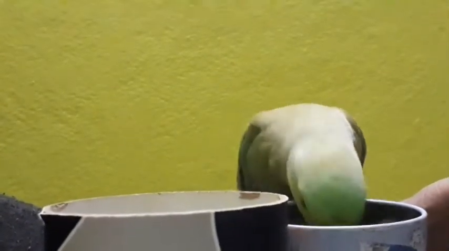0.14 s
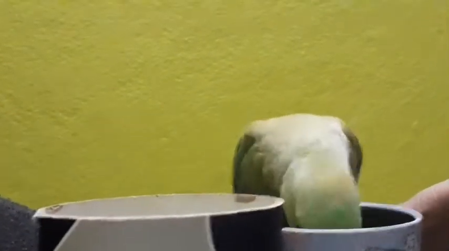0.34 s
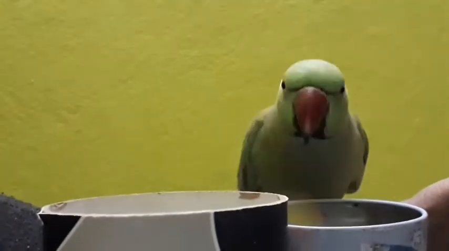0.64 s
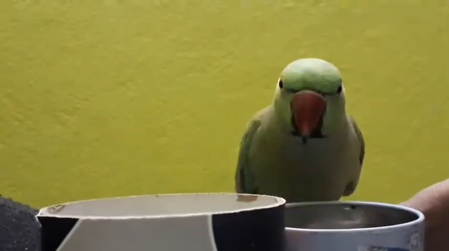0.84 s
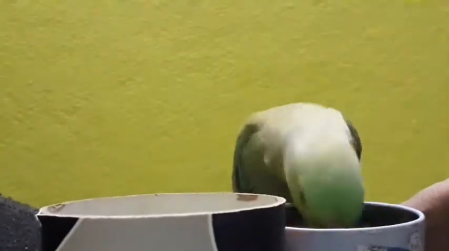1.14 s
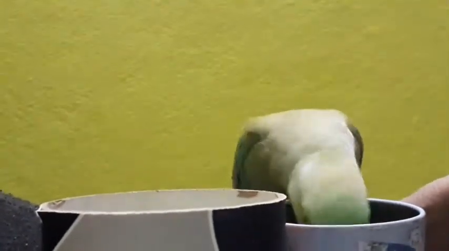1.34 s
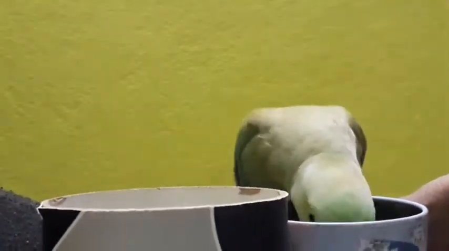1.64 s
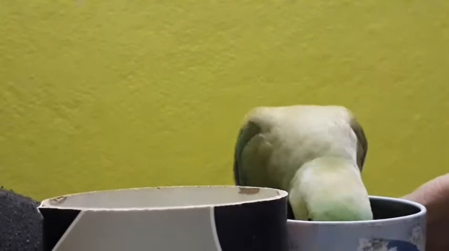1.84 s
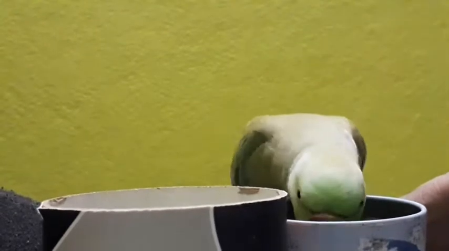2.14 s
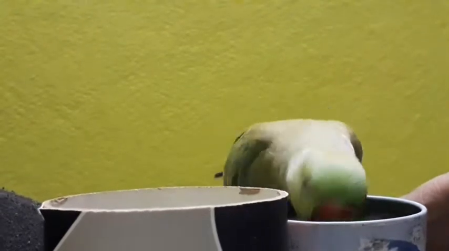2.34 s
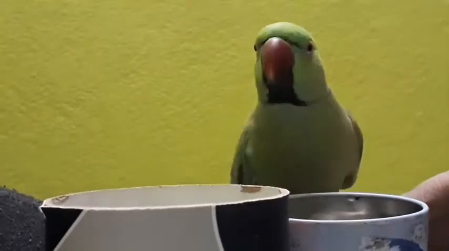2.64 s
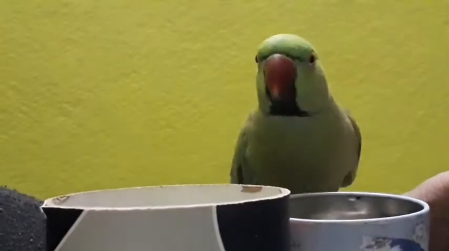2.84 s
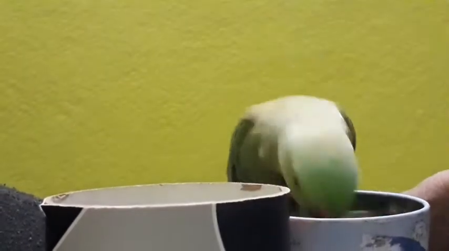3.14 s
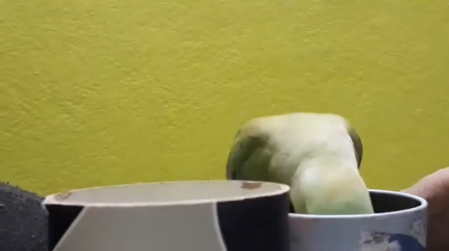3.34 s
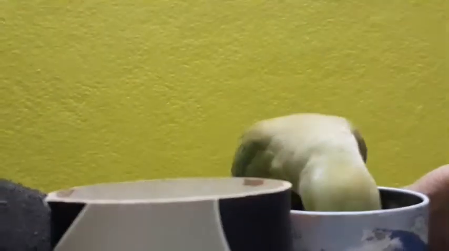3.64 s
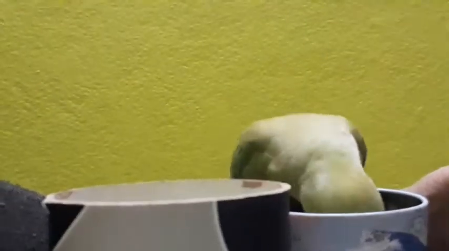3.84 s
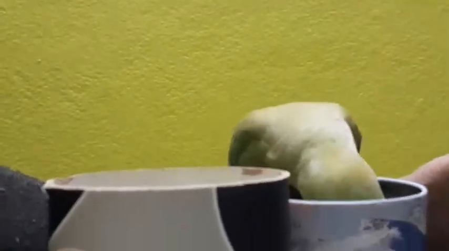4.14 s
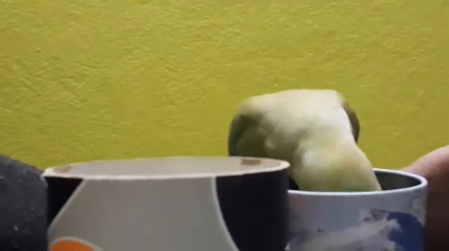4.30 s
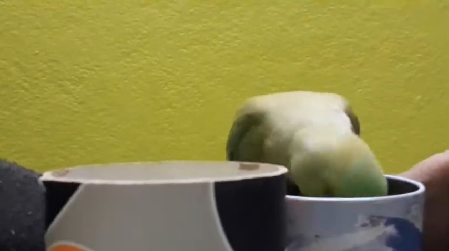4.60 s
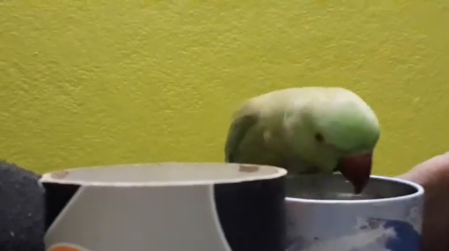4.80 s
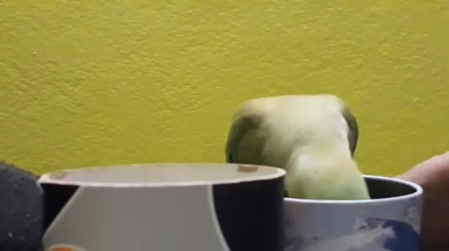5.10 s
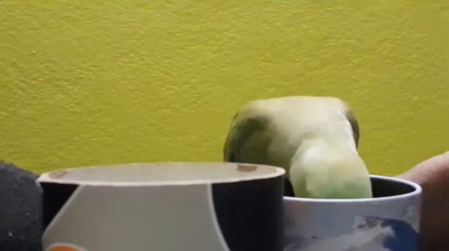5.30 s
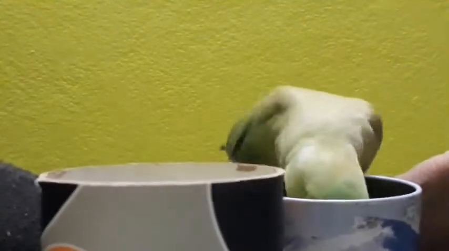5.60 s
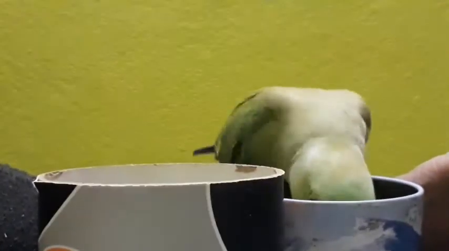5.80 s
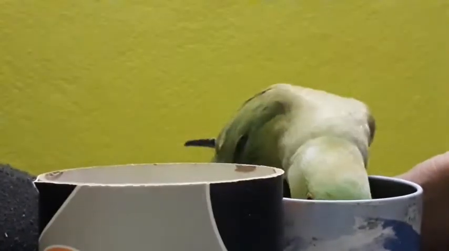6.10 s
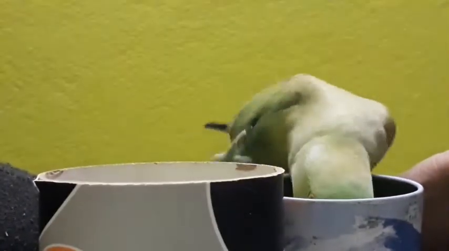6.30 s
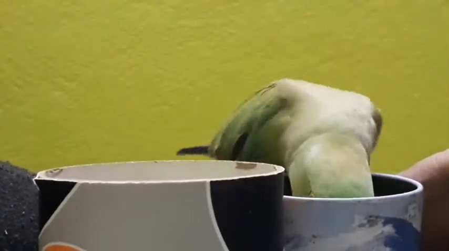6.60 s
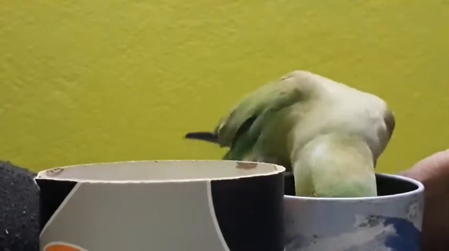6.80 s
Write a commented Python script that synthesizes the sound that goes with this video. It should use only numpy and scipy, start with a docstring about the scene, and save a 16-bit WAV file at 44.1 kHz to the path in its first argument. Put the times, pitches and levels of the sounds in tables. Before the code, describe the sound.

A parakeet's beak picks at coins in a small metal tin, with bright clinks, a coin bouncing on the table, then duller rattling knocks over soft fan hum.

```python
"""A ceiling fan swishes softly throughout, as throbbing hum and noise; hiss lies under it.
A parakeet's beak slides coins (filtered friction clicks) in a small metal tin, close to a phone in a hard room.
A clock ticks each second, as noise through short modes; coins knock on the tin as chatter, bright while loose.
Coins ring as decaying tones; a dropped one bounces on the table, chattering on a duller body.
Feathers rub the rim as the head dips in; then the bird presses into the heap and the knocks turn dull."""
import sys
import numpy as np
from scipy import signal
from scipy.fft import rfft, irfft
from scipy.io import wavfile

SR = 44100
rng = np.random.default_rng(int(sys.argv[2]) if len(sys.argv) > 2 else 0)


def wav_record(signal):
    """Record a signal, one row per channel, as 16-bit PCM in the file named by sys.argv[1]."""
    frames = np.transpose(np.atleast_2d(signal))
    bounded = np.clip(frames, -1, 1)
    # unit amplitude maps onto the largest positive 16-bit level
    quanta = np.round(bounded * 32767).astype(np.int16)
    wavfile.write(sys.argv[1], SR, quanta)


N = 306495
TIME = np.arange(N) / SR

# coins pushed over each other: start_s, length_s, level_db, centre_hz
SLIDES = [(0.312, 0.15, -53.5, 3340), (0.71, 0.057, -31.5, 3500), (1.257, 0.17, -69, 4010),
          (1.679, 0.4, -72.5, 3170), (2.029, 0.18, -47.5, 4400), (2.103, .17, -38, 6600),
          (3.521, .32, -67.5, 6300), (3.617, 0.13, -58, 3560), (3.932, 0.083, -72, 5250),
          (4.12, 0.1, -61, 6030), (4.292, .45, -54, 5006), (4.727, 0.2, -42.5, 5590),
          (5.047, 0.52, -58, 4000), (5.865, 0.13, -53, 3790), (6.411, 0.082, -53.5, 3820)]
PRESSED_FROM_S = 3.2  # from here on the coins lie pressed in the heap


def undb(db):
    """Decibels to gain."""
    return 10 ** (np.asarray(db) / 20)


def unit(x):
    """Scale to an rms of 1."""
    return x / np.sqrt(np.mean(x ** 2))


def unit_energy(x):
    """Scale to an energy of 1."""
    return x / np.linalg.norm(x)


def decay(t, t60_s):
    """Exponential decay that loses 60 dB in t60_s."""
    return undb(-60 * t / t60_s)


def add(out, start_s, x):
    """Mix x into out at start_s."""
    i = max(int(start_s * SR), 0)
    out[i:i + len(x)] += x[:max(N - i, 0)]


def sift(x, hz, kind, order=4):
    """Low-, high- or band-pass."""
    sos = signal.butter(order, np.minimum(hz, .49 * SR), kind, fs=SR, output="sos")
    return signal.sosfilt(sos, x)


def band(x, hz, width_hz):
    """A broad resonance around hz."""
    low_hz = np.hypot(hz, width_hz / 2) - width_hz / 2
    return sift(x, [low_hz, low_hz + width_hz], "bandpass", order=2)


def response(points, size=2048):
    """Minimum-phase impulse response of unit energy with a (Hz, dB) colour."""
    hz, db = np.transpose(points)
    bins_hz = np.fft.rfftfreq(size, 1 / SR)
    gain = undb(np.interp(np.log(bins_hz + 1), np.log(hz), db))
    cepstrum = irfft(np.log(gain))
    # keeping the doubled causal half of the cepstrum makes the response causal
    return unit_energy(irfft(np.exp(rfft(2 * cepstrum[:size // 2], size))))


def noise(points):
    """Steady noise of rms 1 with a (Hz, dB) colour."""
    return unit(signal.fftconvolve(rng.standard_normal(N), response(points))[:N])


def ring(modes, t60_s, detune=0.0056):
    """Decaying modes of unit energy, each shifted a little at random (relative spread detune)."""
    t = TIME[:SR // 8]
    h = np.zeros(len(t))
    for hz, db in modes:
        sign = rng.choice([-1, 1])
        mode_hz = hz * (1 + detune * rng.standard_normal())
        h += undb(db) * sign * np.sin(2 * np.pi * mode_hz * t)
    return unit_energy(h * decay(t, t60_s))


def fan(drone_db=-10, boom_db=-7, throb_db=6.5, air_throb_db=2.0,
        swish_db=-7.0, swish_throb_db=6.0, swish_lead_s=0.01):
    """Each passing blade gives a low throb and a swish, over the motor's hum and a rush of air."""
    # base level of the fan's air, which sinks and comes back: time_s, level_db
    air_levels = [(0, -60.5), (.75, -61.5), (1.05, -80.5), (1.9, -77), (2.6, -69.5), (3.1, -72.5),
                  (3.9, -69.5), (4.5, -59), (5.3, -57.5), (6.95, -56.5)]
    # colour of the rush of air: freq_hz, level_db
    air_colour = [(30, -21), (60, 1.5), (140, -2), (300, -2), (620, -1), (900, -5), (1200, -15),
                  (4000, -20), (8000, -38), (16000, -42)]
    blade_hz, blade_at_s = 5.935, .045
    motor_hz, motor_db = 96.7, -73.5
    air_db = np.interp(TIME, *np.transpose(air_levels))
    blade = np.cos(2 * np.pi * blade_hz * (TIME - blade_at_s))
    edge = np.cos(2 * np.pi * blade_hz * (TIME - blade_at_s + swish_lead_s))

    motor_tone = np.sin(2 * np.pi * motor_hz * TIME)
    drone = unit(motor_tone + 0.5 * unit(band(rng.standard_normal(N), 94, 62)))
    boom = unit(band(rng.standard_normal(N), 137, 4.3))
    throb = undb(air_db + throb_db * blade) * (undb(drone_db) * drone + undb(boom_db) * boom)
    hum = undb(motor_db) * drone + throb
    air = undb(air_db + air_throb_db * blade) * noise(air_colour)

    # the swish whistles faintly at its lower edge and grows duller towards the end
    rush = rng.standard_normal(N)
    whistle = band(rush, 2930, 260)
    sheen = np.interp(TIME, [4.3, 6.3], [.8, 0]) * sift(rush, [4500, 6600], "bandpass")
    swish = unit(sift(rush, [2400, 4400], "bandpass") + whistle + sheen)
    return hum + air + undb(air_db + swish_db + swish_throb_db * edge) * swish


def tin():
    """The tin's answer to one contact: a crack and a short ring, its modes shifted by the load of coins."""
    # wall and bottom modes: freq_hz, level_db
    tin_modes = [(720, -11), (947, -4.5), (1930, -3), (2580, -9.5), (3282, 4.5), (3700, 2.5), (3980, 3.5),
                 (4270, -7.5), (4750, -2.5), (4980, 1), (5548, 1.5), (6050, -8.5)]
    # colour of a contact: freq_hz, level_db
    crack_colour = [(70, -39.5), (200, -23.5), (550, -12.5), (1000, -7), (1400, 1), (2200, 0.5),
                    (3600, 1.5), (6000, 2.5), (8000, 1.5), (11000, -5), (15500, -4)]
    ring_db, ring_t60_s = -8, .024
    h = undb(ring_db) * ring(tin_modes, ring_t60_s)
    crack = response(crack_colour)
    return h + np.pad(crack, (0, len(h) - len(crack)))


def friction(catches_per_s, scatter_db):
    """Two surfaces catch and slip in a stream of tiny random clicks."""
    catches = rng.random(N) < catches_per_s / SR
    signs = rng.choice([-1, 1], N)
    return catches * signs * undb(scatter_db * np.minimum(rng.exponential(size=N), 5))


def slides(taper=0.067):
    """Embossed coin faces scrape over each other and stir the tin."""
    # width / centre: loose coins scrape over a wide band, pressed ones over a narrow one
    loose_width, pressed_width = 4.5, 0.51
    out = np.zeros(N)
    for start_s, length_s, db, hz in SLIDES:
        n = int(length_s * SR)
        width_hz = hz * (pressed_width if start_s > PRESSED_FROM_S else loose_width)
        clicks = friction(catches_per_s=3600, scatter_db=4.5)[:n]
        scrape = band(signal.fftconvolve(clicks, tin())[:n], hz, width_hz)
        add(out, start_s, undb(db) * unit(scrape) * signal.windows.tukey(n, taper))
    return out


def jostles(rate_per_s=24, relative_db=0, scatter_db=2.5):
    """A slide jostles the neighbouring coins into small knocks at random moments."""
    out = np.zeros(N)
    for start_s, length_s, slide_db, hz in SLIDES:
        for s in start_s + length_s * rng.random(round(rate_per_s * length_s)):
            db = slide_db + relative_db + scatter_db * rng.standard_normal()
            add(out, s, knock(db, s, hz))
    return out


def clock(first_s=.318, level_db=-61.5, t60_s=0.24):
    """A far tick each second: short modes blurred by the room into a decaying wash."""
    # freq_hz, level_db
    clock_modes = [(1300, -2), (1520, -1.5), (1760, -7), (2770, -10.5), (3980, -15.5)]
    out, t = np.zeros(N), TIME[:SR // 4]
    for s in np.arange(first_s, N / SR):
        wash = rng.standard_normal(len(t)) * (1 - np.exp(-t / .012)) * decay(t, t60_s)
        tick = signal.fftconvolve(wash, ring(clock_modes, 0.0039))[:len(t)]
        add(out, s, undb(level_db) * unit(tick))
    return out


def strike(body, db, bright_db, thud_db, chatter_s, attack_s):
    """A coin chatters briefly on a body; a hard edge adds treble, a flat fall adds thud."""
    t = TIME[:SR // 25]
    envelope = np.exp(-t / chatter_s) * (1 - np.exp(-t / (.5 * chatter_s)))
    x = signal.fftconvolve(rng.standard_normal(len(t)) * envelope, body)
    thud = undb(thud_db) * unit_energy(sift(x, [150, 1300], "bandpass"))
    middle = unit_energy(sift(x, [1400, 7200], "bandpass", order=7))
    treble = undb(bright_db + 6.5) * unit_energy(sift(x, 7800, "highpass"))
    # each part holds the energy of its level kept up for attack_s
    return undb(db) * np.sqrt(attack_s * SR) * (thud + middle + treble)


def knock(db, s, hz):
    """One knock on the tin: the spot that is hit stands out, and strength sets brightness and thud."""
    # brightness at middling strength, before strike's fixed offset: time_s, bright_db
    brightness = [(.4, -9), (.73, 4), (1.6, 0), (2.05, -4), (2.45, 2.5), (4.3, -16.5), (4.75, -24),
                  (4.81, -23), (5.2, -19.5), (5.45, -31.5), (5.9, -14.5), (6.5, -29)]
    spot_db, spot_width_hz = -5.5, 2200
    # harder knocks are brighter and have less thud (slopes in dB per dB)
    middling_db, bright_slope, thud_db, thud_slope = -19, 0.41, -16.5, -0.24
    body, force_db = tin(), db - middling_db
    spot = band(signal.unit_impulse(len(body)), hz, spot_width_hz)
    body = body + undb(spot_db) * unit_energy(spot)
    bright_db = np.interp(s, *np.transpose(brightness)) + bright_slope * force_db
    return strike(body, db, bright_db, thud_db + thud_slope * force_db, chatter_s=0.0025, attack_s=0.0085)


def knocks():
    """The beak tosses coins against the tin."""
    # start_s, level_db, spot_hz
    hits = [(.389, -36.5, 3430), (0.399, -17, 3240), (0.7106, -31, 3330), (0.7225, -28, 4070),
            (0.7298, -25, 4235), (0.786, -30, 4740), (.793, -25.5, 3640), (0.8447, -27, 4540),
            (.853, -34, 4070), (1.359, -54, 3800), (1.595, -58, 5020), (1.683, -45, 4050),
            (1.769, -59.5, 3960), (2.047, -39, 3900), (2.12, -41, 5100), (2.134, -33.5, 5200),
            (2.146, -29, 5000), (2.184, -31, 3520), (2.211, -26, 4000), (2.219, -29.5, 4000),
            (2.401, -46.5, 5800), (2.418, -39.5, 4430), (2.4423, -30.5, 5960), (3.868, -55.5, 5600),
            (4.334, -45, 4100), (4.362, -44, 4640), (4.4174, -38, 5460), (4.441, -46, 5210),
            (4.474, -30.5, 5540), (4.6165, -30.5, 4620), (4.72, -24, 5860), (4.7393, -20, 3600),
            (4.7486, -18, 4170), (4.788, -23, 5200), (4.805, -16.5, 4120), (4.873, -28.5, 4360),
            (4.885, -19.5, 4600), (4.914, -21.5, 4900), (4.9405, -16, 4490), (5.033, -34.5, 4640),
            (5.122, -41, 3680), (5.164, -33, 4300), (5.254, -40, 4170), (5.411, -39.5, 4020),
            (5.451, -42.5, 4346), (5.697, -47, 3630), (5.873, -38, 3800), (5.918, -37.5, 4264),
            (6.486, -52.5, 3680)]
    out = np.zeros(N)
    for s, db, hz in hits:
        add(out, s, knock(db, s, hz))
    return out


def coin_rings(buzz_db=-3, buzz_width_hz=420):
    """Each bending mode rings as a clean tone, smeared by a buzz while the coin grazes its neighbours."""
    # coin: lower_hz, upper_hz, t60_s
    coins = {"small": (9130, 15150, .14), "large": (8960, 14210, .08), "thin": (9300, 14530, .07)}
    # a coin is free to ring: start_s, coin, lower_mode_db
    ring_events = [(.636, "small", -53), (0.7132, "small", -19.5), (.748, "small", -19),
                   (.793, "small", -31), (1.361, "thin", -53), (1.594, "thin", -55),
                   (2.209, "large", -23.5), (2.4408, "large", -31), (2.728, "small", -21.5),
                   (2.813, "small", -28), (2.858, "small", -29), (2.926, "small", -30),
                   (4.7878, "thin", -39.5), (4.809, "large", -37.5), (4.888, "large", -40),
                   (4.9395, "large", -34)]
    # coin: upper mode re lower mode in dB, while loose
    upper_mode_db = {"small": 7, "large": -3.5, "thin": -4}
    pressed_upper_db = 16  # the upper mode gains on the lower one in the heap
    out, t = np.zeros(N), TIME[:SR // 3]
    for s, coin, db in ring_events:
        *modes_hz, t60_s = coins[coin]
        upper_db = db + upper_mode_db[coin] + pressed_upper_db * (s > PRESSED_FROM_S)
        for hz, mode_db in zip(modes_hz, (db, upper_db)):
            tone = np.sin(2 * np.pi * (hz + 30 * rng.standard_normal()) * t)
            buzz = unit(band(rng.standard_normal(len(t)), hz, buzz_width_hz)) / np.sqrt(2)
            add(out, s, undb(mode_db) * decay(t, t60_s) * (tone + undb(buzz_db) * buzz))
    return out


def bounces():
    """A dropped coin lands on one edge, then its far edge slaps down duller, at every bounce."""
    # start_s, level_db, bright_db
    landings = [(2.7258, -19.5, 5.5), (2.8125, -27, 11), (2.861, -35, 7), (2.9213, -37.5, 7.5),
                (2.93, -38, 13.5)]
    # colour of a contact on the table: freq_hz, level_db
    table_colour = [(50, -27), (150, -2.5), (260, 10), (650, 6.5), (1200, 1.5), (2200, -5), (4300, 6),
                    (7000, -5), (11000, -18.5), (15500, -3.5)]
    # lag_s, level_db, bright_db of each edge, relative to the landing
    edges = (0, 0, 0), (.0036, -3, -14.5)
    out, table = np.zeros(N), response(table_colour)
    for s, db, bright_db in landings:
        for lag_s, edge_db, edge_bright_db in edges:
            hit = strike(table, db + edge_db, bright_db + edge_bright_db, thud_db=-5,
                         chatter_s=0.00079, attack_s=0.0018)
            add(out, s + lag_s, hit)
    return out


def feathers():
    """Feathers rub softly on the rim, swelling and fading as the head dips in."""
    # freq_hz, level_db
    rub_colour = [(150, -6.5), (800, 0.5), (1500, 0.5), (2400, -4), (5000, -0.5), (8200, 2.5), (9400, -13),
                  (15500, -16)]
    db = np.interp(TIME, [3.18, 3.21, 3.33, 3.46, 3.6, 3.7], [-110, -59.0, -48.5, -47.5, -70.5, -110])
    clicks = friction(catches_per_s=4700, scatter_db=2.5)
    return undb(db) * unit(signal.fftconvolve(clicks, response(rub_colour))[:N])


def room(x, low_t60_s=0.22, treble_t60_s=0.19, level_db=-6.5):
    """Dense reflections off bare walls, with one decay for the lows and one for the treble."""
    t = TIME[:SR // 2]
    wash = rng.standard_normal(len(t)) * np.clip(t / 0.0035, 0, 1)
    low = sift(wash, 2800, "lowpass", order=1)
    h = low * decay(t, low_t60_s) + (wash - low) * decay(t, treble_t60_s)
    return undb(level_db) * signal.fftconvolve(x, unit_energy(h))[:N]


def scene():
    """Everything is near the centre; only the reflections spread a little, most in the treble."""
    # freq_hz, level_db
    hiss_colour = [(30, -13), (70, 11.5), (1500, -10.5), (4500, -16), (8000, -16), (15500, -17)]
    background = fan() + undb(-73) * noise(hiss_colour) + clock() + feathers()
    coins = slides() + jostles() + knocks() + coin_rings() + bounces()
    mid = coins + room(coins) + background
    spread = room(coins + background)
    side = undb(-23) * sift(spread, [4400, 12000], "bandpass") + undb(-39) * spread
    return np.array([mid + side, mid - side])


def record(dry, top_hz=15850):
    """The phone limits at full scale, then cuts the top."""
    sos = signal.ellip(10, .1, 60, top_hz, fs=SR, output="sos")
    return signal.sosfiltfilt(sos, np.clip(dry, -1, 1))


dry = scene()
out = record(dry)
wav_record(out)
```